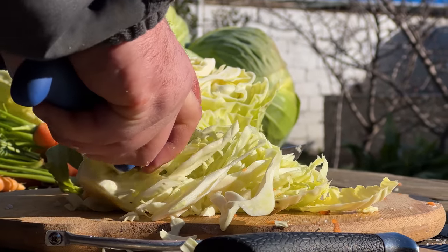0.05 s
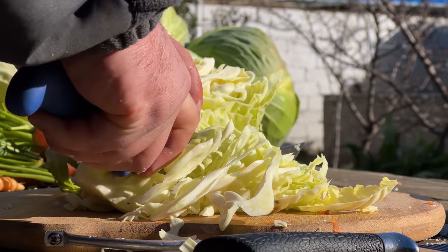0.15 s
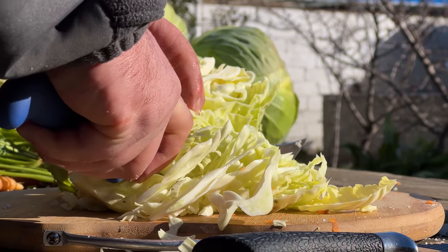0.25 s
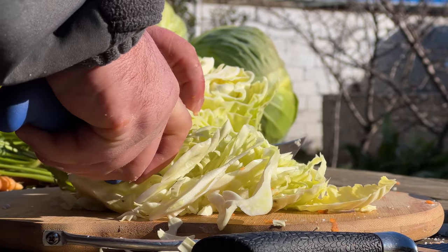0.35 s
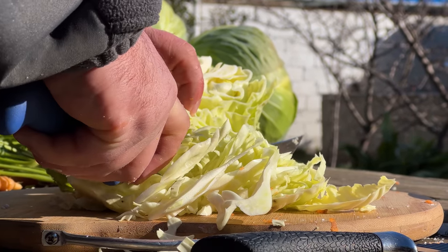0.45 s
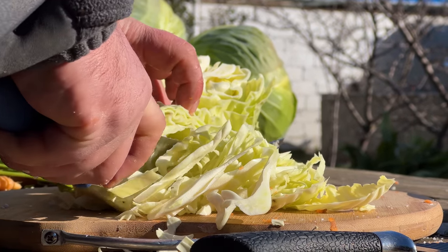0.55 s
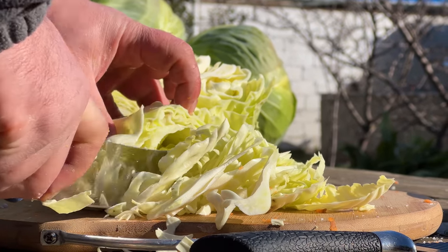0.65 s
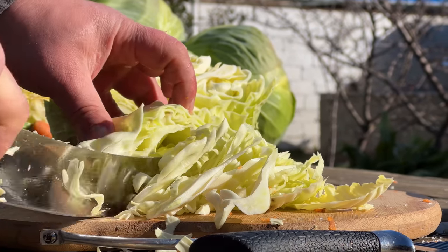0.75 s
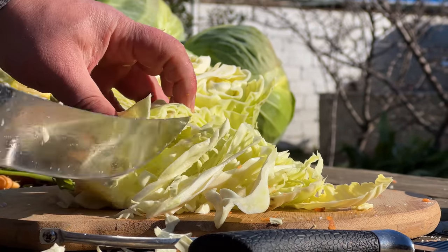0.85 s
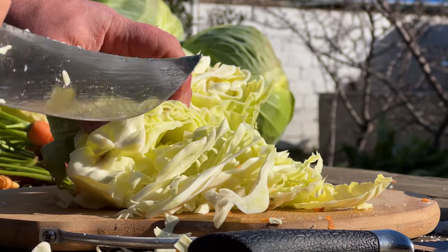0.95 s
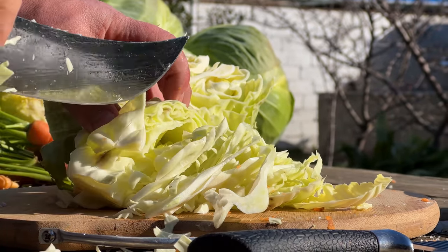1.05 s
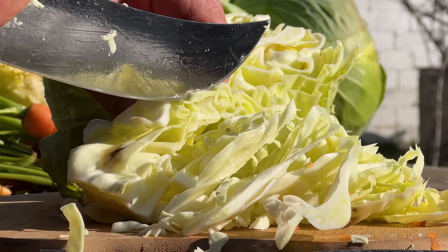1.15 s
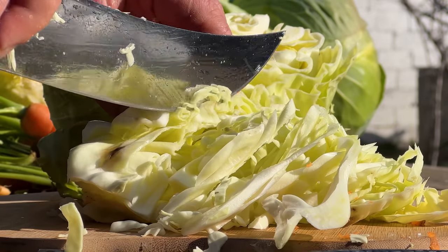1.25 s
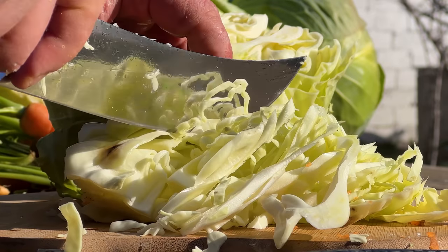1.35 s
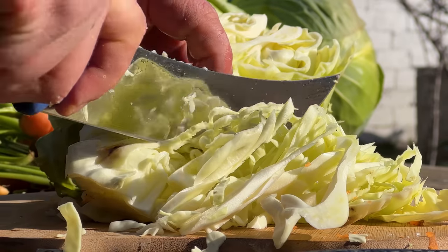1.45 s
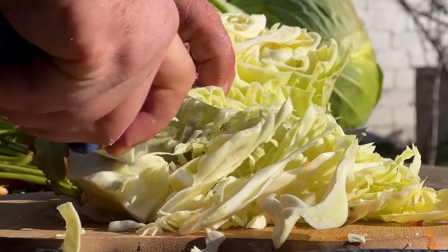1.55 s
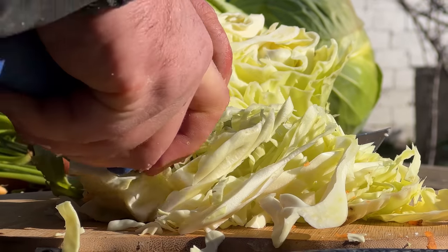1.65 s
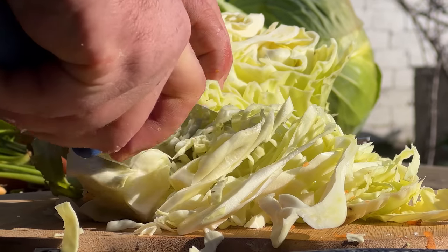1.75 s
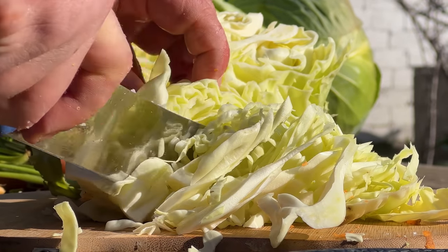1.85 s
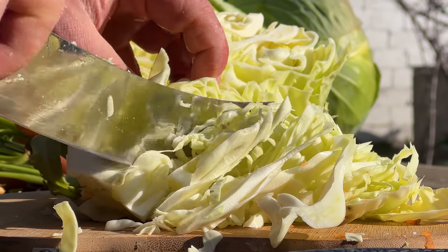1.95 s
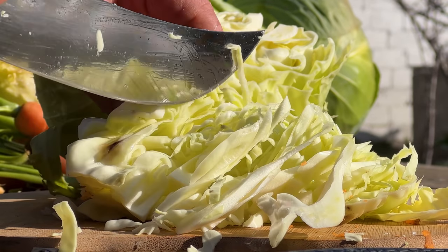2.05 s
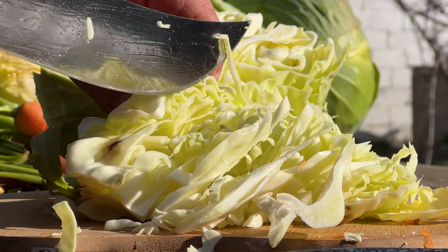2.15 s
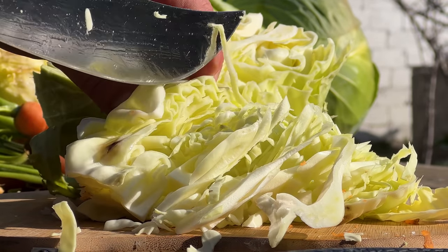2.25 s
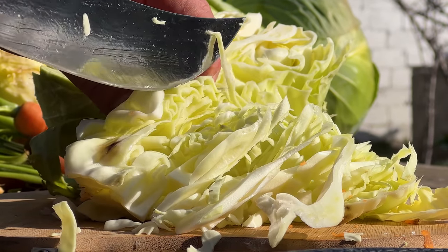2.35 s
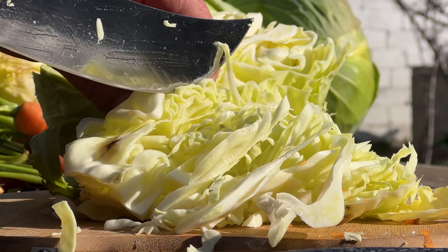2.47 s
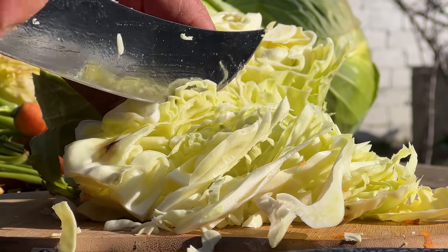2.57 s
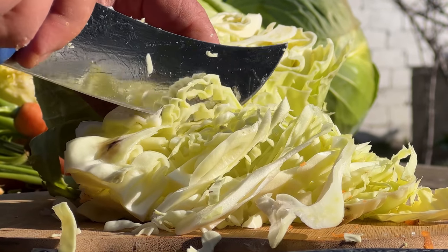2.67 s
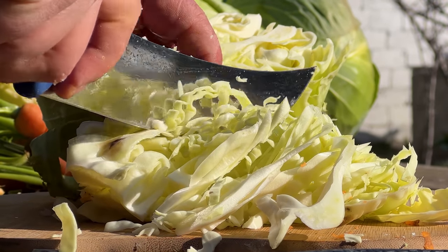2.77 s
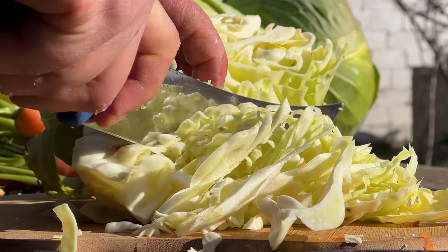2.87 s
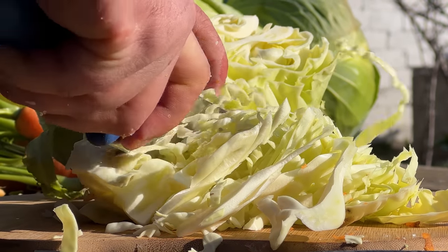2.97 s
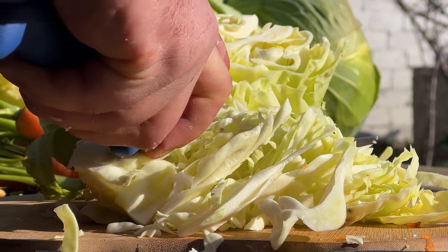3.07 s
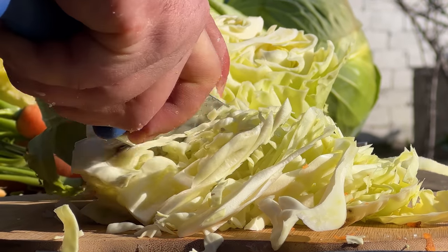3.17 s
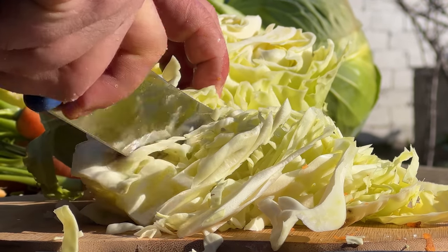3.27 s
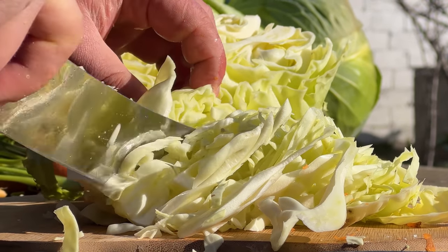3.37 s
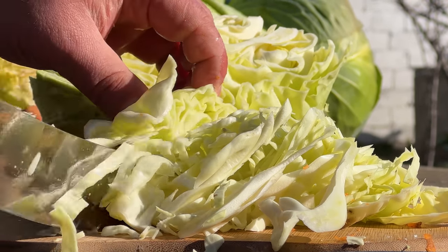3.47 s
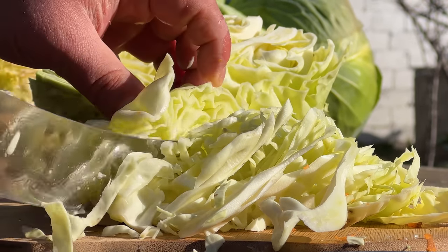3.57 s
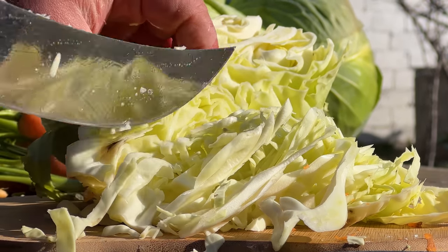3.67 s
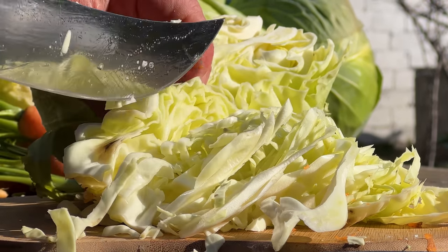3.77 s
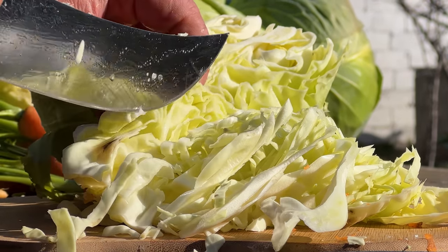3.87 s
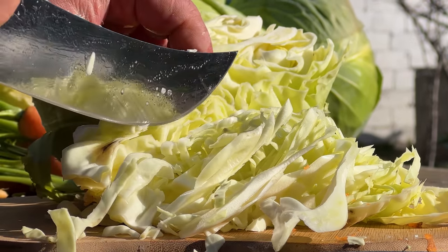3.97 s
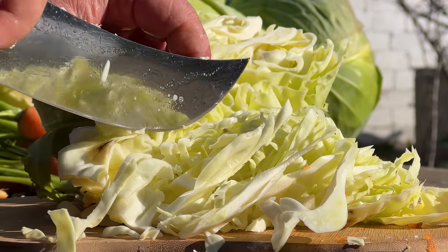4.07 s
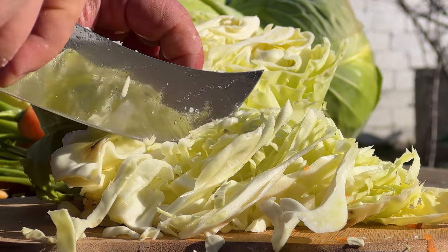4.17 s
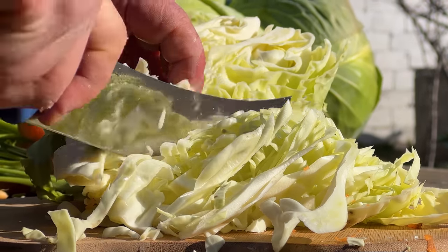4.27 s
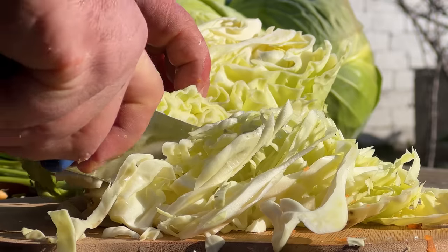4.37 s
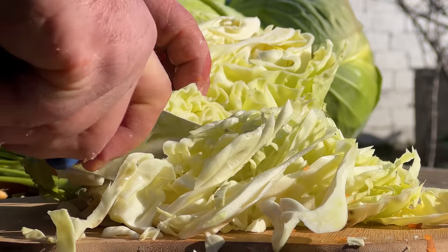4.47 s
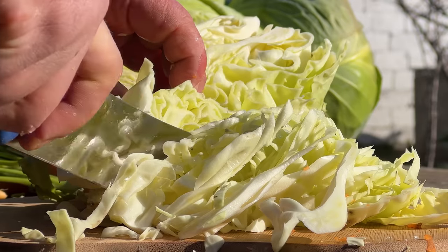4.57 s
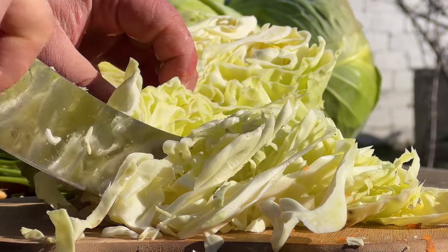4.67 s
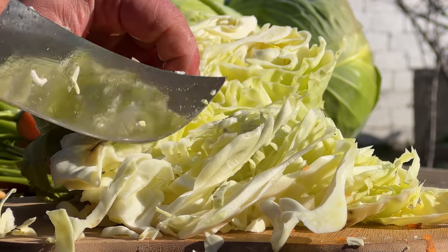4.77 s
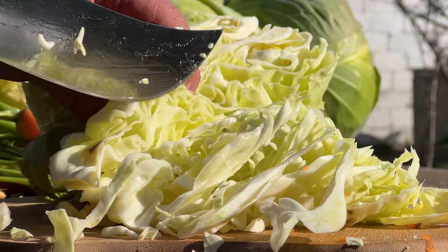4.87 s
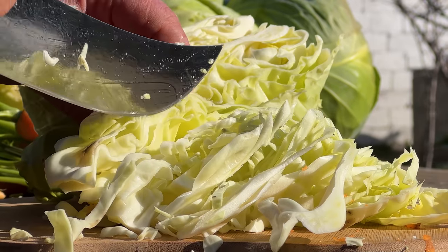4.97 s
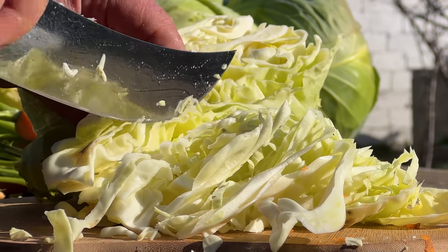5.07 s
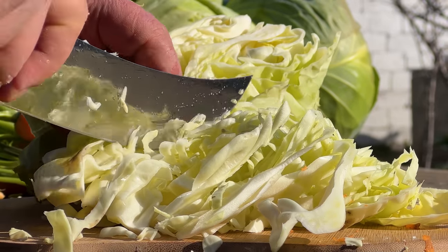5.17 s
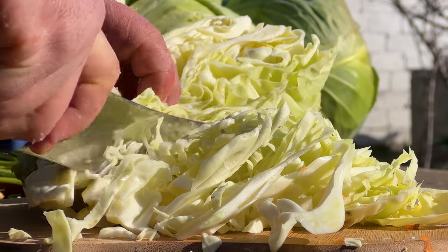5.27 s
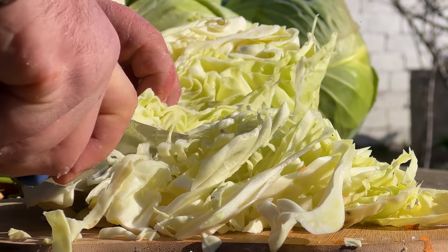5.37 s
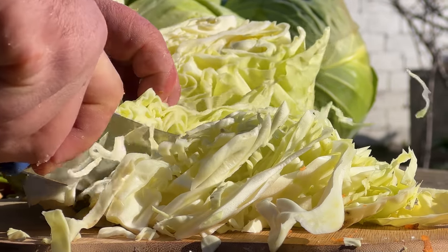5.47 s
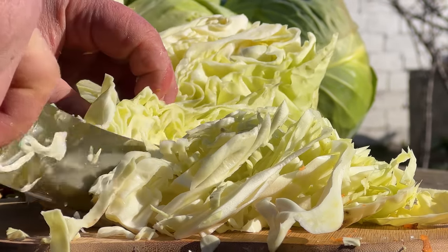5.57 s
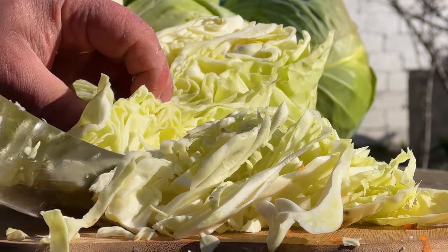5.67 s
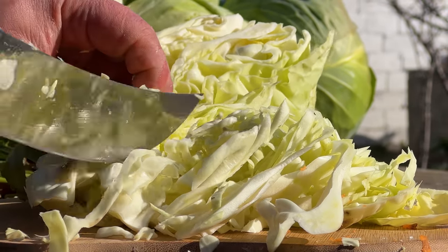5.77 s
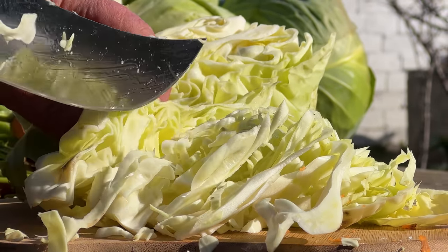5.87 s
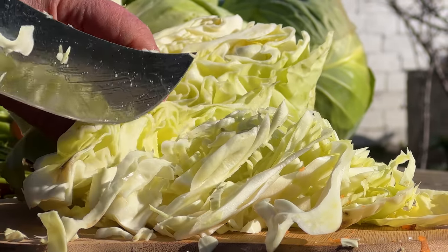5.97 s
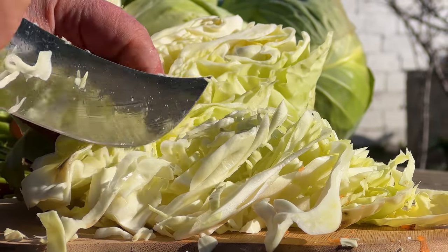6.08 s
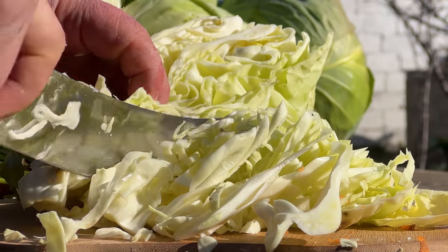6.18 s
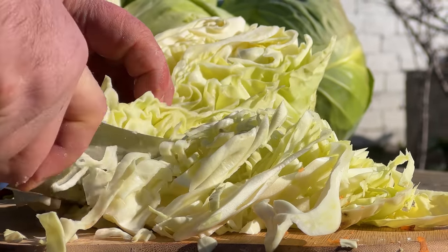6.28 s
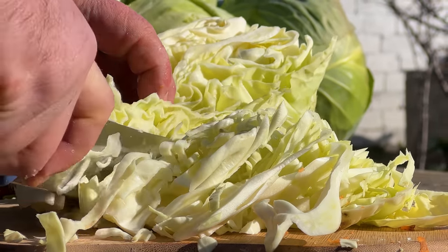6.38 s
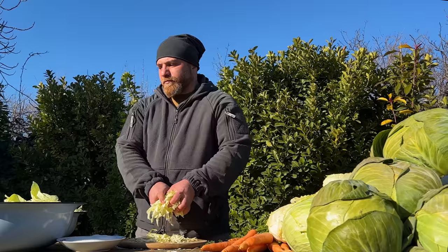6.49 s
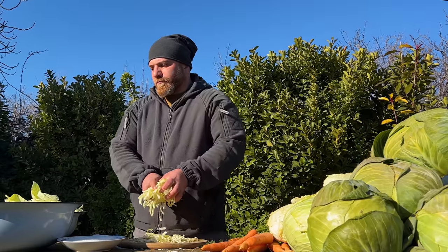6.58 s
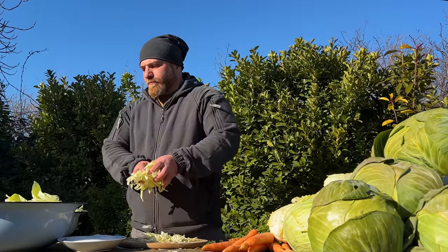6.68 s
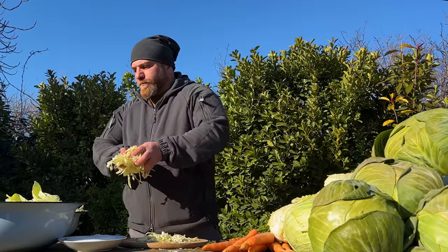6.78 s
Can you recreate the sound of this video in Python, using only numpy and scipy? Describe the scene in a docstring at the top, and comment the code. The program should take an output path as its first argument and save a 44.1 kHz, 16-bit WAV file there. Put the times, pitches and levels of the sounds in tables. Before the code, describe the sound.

A large knife crunches through cabbage on a wooden board, each stroke ending in a knock, with shreds rustling and wind rumbling on the microphone.

```python
"""A large knife shreds cabbage on a wooden board, on a table out of doors.
It opens at the end of a stroke and a knock; six more strokes follow, each a thickening crunch of random
bursts in leaf and rib, ended by the edge knocking the board's ringing modes. Between strokes the shreds
rustle, snap and drag under hand and blade. Throughout, filtered noise makes wind on the microphone over a
faint distant hush; the wind surges near 6.3 s, and in the last moments the leaves sound further away."""
import sys
import numpy as np
from scipy import signal
from scipy.fft import rfft, irfft
from scipy.io import wavfile

SR = 44100
rng = np.random.default_rng(int(sys.argv[2]) if len(sys.argv) > 2 else 0)


def persist_wave(psi):
    """Save psi, clipped to +-1, as 16-bit WAV."""
    counts = np.round(np.clip(psi, -1, 1) * 32767).astype(np.int16)
    wavfile.write(sys.argv[1], SR, np.atleast_2d(counts).T)


N = 301198   # length in samples
MOMENTS = np.arange(0, N + 44, 44) / SR   # times in s, about 1 ms apart, where envelopes are drawn

# tone of the distant hush: pitch_hz, relative level_db (per Hz)
HUSH_TONE = [(90, -24), (150, -4), (830, -9.5), (2200, -19.5), (5000, -47), (7000, -40.5), (10200, -62),
             (12500, -39)]
HUSH_DB = -60.5

# wind on the microphone: start_s, relative rumble level_db, flutter against the rumble_db
WIND_COURSE = [(0.0, -44, -5), (0.12, -46.5, 0), (0.87, -54, -7.5), (1.05, -49.5, -21), (1.45, -64.5, 5),
               (2.4, -57, -12.5), (3.08, -53, -1), (3.23, -45, -19), (3.58, -45.5, -33), (3.94, -50, -31),
               (4.13, -46, -25.5), (4.53, -55.5, -1), (4.73, -46.5, -25.5), (5.42, -53.5, -1.5),
               (5.73, -45, -11), (6.11, -50.5, -9.5), (6.31, -31, -20), (6.47, -45.5, -6), (6.83, -43, -7)]
# tone of the wind: pitch_hz, relative level_db (per Hz)
WIND_TONE = [(20, -27), (43, -3.5), (62, -2), (216, -16), (400, -24.5), (800, -59)]
# single strong eddies passing the microphone: centre_s, level_db, pitch_hz at the centre
EDDIES = [(0.073, -25, 225), (0.097, -25.5, 149), (0.128, -33, 125), (0.289, -34, 78), (0.363, -35.5, 261),
          (3.222, -30.5, 69), (3.538, -29.5, 100), (4.148, -30, 80), (5.689, -32.5, 71), (6.297, -22, 104),
          (6.353, -24.5, 77.5), (6.506, -35.5, 198), (6.643, -32.5, 207), (6.734, -36, 162)]

# blade and shreds dragged over the board: peak_s, level_db, swell_s, fade_s (see swell)
DRAG_TOUCHES = [(.36, -53, .05, .2), (.64, -53, .14, .05), (.715, -50, .1, .3), (4.56, -53, .02, .15),
                (5.56, -52, .12, .2), (5.69, -51, .2, .12), (6.668, -52, .03, .15), (6.775, -53, .04, .1)]
# edge on the board: start_s, peak level_db, hardness_db per octave, place (0 middle, 1 rim),
# rebound delay_ms, rebound level_db at 800 Hz
BOARD_HITS = [(0.021, -12.5, 2.5, 0.32, 7.8, -22), (0.332, -35.5, 4, 1, 9, -6),
              (.572, -32.5, 0.5, 0.53, 6.5, -14), (1.635, -13, 2, 0.24, 15, -13.5),
              (3.024, -21, -2.5, 0.13, 7.7, -30), (3.4717, -5.5, 6.5, 0.9, 7.31, -6),
              (4.408, -15, -4.5, 0.12, 16, -14.5), (5.379, -18, -1, 0.2, 12.8, -11),
              (6.304, -18.5, -8.5, 0.084, 6.5, -42)]
# ways the board rings: pitch_hz, relative level_db struck in the middle, change at the rim_db,
# time to fall 60 dB_s
BOARD_MODES = [(217, -19, 16.5, 0.075), (347, -23, 15, 0.1), (418, -13, 0.5, 0.18), (483.5, -2, 10, 0.07),
               (563, -7.5, -11, 0.097), (687, 1, -4.5, 0.098), (834, 17, -22, 0.053),
               (1172, -14.5, 14, 0.082), (1240, 5, -18.5, 0.064), (1475, 19, -9.5, 0.0076),
               (2270, -8.5, 4, 0.016), (2770, -12.5, 6.5, 0.015)]
SWING_IN_CYCLES = 0.17   # a board mode takes this many cycles to build up

# single ribs and leaves snapping: start_s, peak level_db, ring pitch_hz
LEAF_SNAPS = [(0.087, -28, 6060), (0.1193, -25.5, 6840), (0.1596, -45, 7700), (0.197, -33, 6360),
              (0.2503, -30.5, 6040), (0.271, -38, 11800), (0.3223, -40, 7500), (0.34, -41, 6000),
              (0.428, -39, 4530), (0.4595, -33, 2270), (0.472, -23.5, 2000), (0.5013, -28.5, 6160),
              (0.5185, -30, 11700), (0.572, -29, 3230), (0.6, -26, 2170), (0.6383, -32.5, 7700),
              (0.664, -31.5, 1800), (0.704, -26, 2480), (0.7876, -40, 2300), (0.8853, -30, 2400),
              (0.911, -39, 12000), (0.934, -31.5, 3500), (1.0004, -45, 4370), (1.054, -44, 2140),
              (1.124, -36, 3340), (1.1703, -36, 13000), (1.196, -34, 3470), (1.222, -33.5, 3550),
              (1.239, -34, 3500), (1.2794, -30.5, 2980), (1.3078, -25.5, 2200), (1.3371, -29, 2240),
              (1.4596, -24.5, 1620), (1.5823, -25, 2880), (1.6652, -35, 5600), (1.674, -32.5, 5430),
              (1.8303, -33, 12000), (1.874, -29, 13000), (1.9967, -48, 2070), (2.0958, -37.5, 2080),
              (2.2994, -45.5, 2400), (2.5386, -30.5, 2980), (2.554, -25, 3000), (2.618, -26.5, 2100),
              (2.83, -25, 2280), (2.9656, -22.5, 3300), (2.9737, -16, 1510), (3.041, -35, 1660),
              (3.071, -27, 1610), (3.5744, -40.5, 1660), (3.683, -42, 2230), (3.711, -39, 2770),
              (3.7415, -47, 3190), (3.7723, -42.5, 2270), (3.8148, -40, 2400), (3.8833, -44, 3500),
              (4.049, -47.5, 2290), (4.162, -32, 2240), (4.172, -26, 2270), (4.3122, -23.5, 2140),
              (4.393, -26, 3300), (4.4051, -19, 2920), (4.4469, -34.5, 3000), (4.4868, -36.5, 2900),
              (4.5456, -29.5, 2350), (4.557, -28.5, 5500), (4.584, -27.5, 6590), (4.6081, -24, 3250),
              (5.0325, -24, 5500), (5.0674, -29.5, 2400), (5.1403, -22, 3170), (5.149, -28, 3500),
              (5.178, -24, 2260), (5.1958, -16, 2200), (5.212, -19, 1650), (5.2463, -16, 1580),
              (5.278, -17, 2780), (5.399, -31, 2500), (5.459, -38, 5470), (5.503, -36.5, 2600),
              (5.531, -31.5, 2000), (5.5429, -22, 5030), (5.6462, -32, 2220), (5.746, -64, 4260),
              (5.992, -44, 1640), (6.1562, -29, 2270), (6.2668, -25.5, 5500), (6.471, -36.5, 12000),
              (6.8055, -53, 13500)]
SNAP_S = 0.0018   # time constant of the die-away
# tone of the crunch and the snaps: pitch_hz, relative level_db (per Hz)
CRACKLE_TONE = [(400, 3), (700, -7.5), (1400, -4), (3400, -3.5), (7600, -3.5), (9900, -13), (11600, -1.5),
                (13000, -3), (15500, -6.5)]

# knife strokes; the crunch bites, changes steadily and stops at the board: bite_s, end_s,
# relative crunch level at the bite_db, at the end_db, die-away_db per s,
# body around 1.5 kHz against the treble at the bite_db, at the end_db
KNIFE_STROKES = [(-.1, 0.013, -21, -39, 377, -3.5, 0), (1.126, 1.626, -52.5, -40, 788, -10.5, 2),
                 (2.536, 3.002, -52.5, -36, 290, -1.5, 1), (3.145, 3.47, -60, -37, 599, 4.5, -14.5),
                 (4.162, 4.394, -51, -33.5, 426, -6.5, 1.5), (5.024, 5.375, -54.5, -32.5, 598, -4, 0),
                 (6.021, 6.297, -67, -39, 822, 2, -6.5)]
BITE_DB_PER_S, STILL_DB = 790, -106   # steepness of each bite, floor between touches
# hand and blade shifting shreds: peak_s, relative level_db, swell_s, fade_s, body against treble_db
SHRED_RUSTLES = [(.04, -47, .06, .1, -2), (.098, -45, .06, .07, 3.5), (.245, -48, .18, .12, -2),
                 (.335, -54, .2, .09, 2), (.467, -49, .05, .06, -2), (.54, -45, .09, .35, -2.5),
                 (.72, -54, .3, .35, 2), (.875, -46.5, .07, .1, -5), (.995, -63, .12, .13, -8),
                 (1.34, -47, .2, .3, 3), (1.685, -50, .08, .08, 0), (1.76, -61, .2, .2, -3),
                 (1.865, -48, .16, .2, -8.5), (2.1, -69.5, .12, .14, -6), (2.42, -65, .04, .25, -4),
                 (2.51, -60, .2, .35, -3.5), (3.51, -56, .05, .2, 2), (3.71, -65, .3, .3, 1.5),
                 (3.87, -62.5, .3, .12, 0), (4.14, -60, .3, .05, -4), (4.505, -58, .035, .1, -1.5),
                 (4.57, -44, .035, .2, -6), (4.635, -46, .1, .12, -6), (4.73, -59, .15, .14, -5),
                 (5.025, -56, .12, .35, 3), (5.146, -41, .035, .06, -3), (5.207, -34, .03, .04, 0),
                 (5.28, -35, .03, .08, -4), (5.535, -49, .24, .3, -1), (5.67, -55, .15, .25, 2.5),
                 (5.81, -64, .2, .13, 0), (6.335, -60, .03, .2, -4.5), (6.474, -53, .05, .07, -9),
                 (6.52, -60, .2, .2, -4), (6.68, -59, .2, .2, -7), (6.78, -67, .05, .3, 0)]
LET_GO = .6   # how much the ends of a swell steepen
# moments when the crackle stalls: centre_s
STALLS = [.15, .927, 1.118, 1.209, 1.427, 1.498, 2.886, 4.396, 4.54, 4.615, 5.173]
LULL_DB, LULL_S = 8.5, 0.0052   # depth, and time from the centre to 1/e of that depth

BURSTS_PER_S, BURST_MS, FIZZ_DB = 1000, .85, -2   # base rate, die-away time constant, fizz against bursts
BURST_SPREAD_DB = 2.1
RING_SHARE, RING_WIDTH = .9, .14   # ring against its puff, width of the ring against its pitch
FAR_FROM_S, FAR_CUT_HZ, FAR_DENSITY = 6.545, 6300, 1.8   # far leaves: weaker top, ticks blur together

TREBLE_END_HZ, CUTOFF_HZ = 15800, 16699


def from_db(db):
    """Turn a level in dB into a gain."""
    return 10 ** (np.asarray(db) / 20)


def rms_one(x):
    """Scale a sound to an average (rms) strength of 1."""
    return x / np.sqrt(np.mean(x ** 2) + 1e-20)


def in_time(rows):
    """Fill in the columns of a timed table at every sample."""
    s, *columns = np.transpose(rows)
    return [np.interp(np.arange(N) / SR, s, c) for c in columns]


def every_sample(v):
    """Fill in an envelope between its moments."""
    return np.interp(np.arange(N) / SR, MOMENTS, v)


def colour(x, spectrum):
    """Give a sound the listed tone, with a filter that reacts as early as it can (minimum phase)."""
    size = 16384
    hz, db = np.transpose(spectrum)
    grid = np.log(np.maximum(np.arange(size // 2 + 1) * SR / size, 1))
    log_gain = np.interp(grid, np.log(hz), db) * np.log(10) / 20
    # folding the cepstrum puts the whole response after time zero
    cepstrum = irfft(log_gain)
    cepstrum[1:size // 2] *= 2
    cepstrum[size // 2 + 1:] = 0
    response = irfft(np.exp(rfft(cepstrum)))
    return signal.fftconvolve(x, response)[:len(x)]


def band(x, low_hz, high_hz, order=2):
    """Keep the pitches between two limits (Butterworth band-pass)."""
    return signal.sosfilt(signal.butter(order, [low_hz, high_hz], "band", fs=SR, output="sos"), x)


def drift(rate_hz):
    """Make a slowly wandering random curve of spread 1."""
    r = np.exp(-2 * np.pi * rate_hz / SR)
    wander = signal.lfilter([1], [1, -2 * r, r * r], rng.standard_normal(N + SR))
    return rms_one(wander[SR:])   # the first second is run-in


def resonance(x, hz, width_hz):
    """Ring around one pitch: a two-pole band with gain 1 on top."""
    r = np.exp(-np.pi * width_hz / SR)
    feed = np.array([1, 0, -1]) * (1 - r * r) / 2
    return signal.lfilter(feed, [1, -2 * r * np.cos(2 * np.pi * hz / SR), r * r], x)


def swell(s, db, swell_s, fade_s):
    """Level in dB of one touch; it is 32 dB down at swell_s before and fade_s after the peak."""
    t = MOMENTS
    rise = (s - t) / np.clip(swell_s, .005, .35)
    fall = (t - s) / np.clip(fade_s, .005, .35)
    away = np.where(t < s, rise, fall)
    # the flanks steepen as contact is made or lost
    return np.maximum(db - 20 * (away + LET_GO * away ** 3), -150)


def hush():
    """Far traffic and air: nearly steady noise with a fixed tone."""
    noise = colour(rng.standard_normal(N + SR), HUSH_TONE)[SR:]
    return from_db(HUSH_DB + 0.28 * drift(3.0)) * rms_one(noise)


def wind():
    """Wind pressing on the microphone: lumpy low noise, with a faster flutter of eddies above."""
    rumble_db, flutter_db = in_time(WIND_COURSE)
    air = colour(rng.standard_normal(N + SR), WIND_TONE)[SR:]
    lumps, eddies = from_db(2.5 * drift(9)), from_db(3.5 * drift(14))
    rumble = lumps * rms_one(band(air, 36.0, 121))
    flutter = eddies * rms_one(band(air, 121, 480))
    return from_db(rumble_db - 1.5) * (rumble - from_db(flutter_db) * flutter)


def buffets():
    """Pushes of air, two or three cycles long, that sink in pitch as the eddy slows."""
    out, t = np.zeros(N), np.arange(N) / SR
    for (s, db, hz), start in zip(EDDIES, rng.random(len(EDDIES))):
        cycles = (t - s) * hz
        turn = cycles - 0.24 * cycles ** 2 + start
        push = np.exp(-(cycles / 1.18) ** 2) * np.cos(2 * np.pi * turn)
        out += from_db(db) * push
    return out


def drags():
    """Uneven friction of blade and shreds makes the lower board modes ring."""
    grit = from_db(6 * drift(45)) * rng.standard_normal(N)
    rings = sum((-1) ** k * resonance(grit, hz, 0.049 * hz) for k, (hz, *_) in enumerate(BOARD_MODES))
    power = sum(from_db(2 * swell(*row)) for row in DRAG_TOUCHES)
    return every_sample(np.sqrt(power)) * rms_one(band(rings, 440, 1100))


def knocks():
    """The edge lands, rebounds once, and sets the board modes ringing over a short wooden clatter."""
    out, t = np.zeros(N + 8192), np.arange(8192) / SR
    chance = rng.standard_normal((len(BOARD_HITS), len(BOARD_MODES), 2))
    noise = rng.standard_normal((len(BOARD_HITS), 8192))
    for hit, luck, white in zip(BOARD_HITS, chance, noise):
        s, db, hard_db, place, rebound_ms, rebound_db = hit
        late = np.maximum(t - rebound_ms / 1000, 0)
        # dense weak modes of board and table
        rings = from_db(2.0 - 60 * t / 0.071) * rms_one(band(white, 274, 1100))
        for k, ((hz, mode_db, rim_db, t60), (first, second)) in enumerate(zip(BOARD_MODES, luck)):
            octaves = np.log2(hz / 800)
            struck = (-1) ** k * from_db(mode_db + place * rim_db + hard_db * octaves)
            build_up = 1 - np.exp(-t * hz / SWING_IN_CYCLES)
            landing = from_db(2.36 * first - 60 * t / t60) * np.sin(2 * np.pi * hz * t) * build_up
            dull = from_db(rebound_db - 5.3 * octaves)   # the rebound is a softer contact
            rebound = dull * from_db(second - 60 * late / t60) * np.sin(2 * np.pi * hz * late)
            rings = rings + struck * (landing + rebound)
        contact = 1 - np.exp(-(t / 0.0014) ** 2)   # the curved edge rolls into contact
        knock = band(rings * contact, 118, 5300)
        at = round(s * SR)
        out[at:at + 8192] += from_db(db) * knock / np.abs(knock).max()
    return out[:N]


def snaps():
    """Cracks of noise that die in a few ms, part broad, part ringing at the size of the piece."""
    out, t = np.zeros(N + 2048), np.arange(2048) / SR
    noise = rng.standard_normal((len(LEAF_SNAPS), 2048))
    for (s, db, hz), white in zip(LEAF_SNAPS, noise):
        puff = white * (1 - np.exp(-(t / 0.00098) ** 2)) * np.exp(-t / SNAP_S)
        broad = band(colour(puff, CRACKLE_TONE), 0.28 * hz, TREBLE_END_HZ)
        crack = broad + 3.36 * resonance(puff, hz, 0.2 * hz)
        at = round(s * SR)
        out[at:at + 2048] += from_db(db) * crack / np.abs(crack).max()
    return out[:N]


def pressure():
    """Level of the crunch, and of its body against the treble, from strokes and rustles over time."""
    t = MOMENTS
    shapes = []
    for bite, end, bite_db, end_db, die, body_bite_db, body_end_db in KNIFE_STROKES:
        along = np.clip((t - bite) / (end - bite), 0, 1)
        edges = BITE_DB_PER_S * np.minimum(t - bite, 0) - die * np.maximum(t - end, 0)
        level_db = bite_db + (end_db - bite_db) * along + edges
        shapes.append((level_db, body_bite_db + (body_end_db - body_bite_db) * along))
    for s, db, swell_s, fade_s, body_db in SHRED_RUSTLES:
        shapes.append((swell(s, db, swell_s, fade_s), body_db))
    # doubling the dB gives power, and powers add up
    still = from_db(2 * STILL_DB)
    power = still + sum(from_db(2 * np.maximum(db, -150)) for db, _ in shapes)
    body = still + sum(from_db(2 * np.maximum(db + body_db, -150)) for db, body_db in shapes)
    lull_db = sum(LULL_DB * np.exp(-((t - s) / LULL_S) ** 2) for s in STALLS)
    return every_sample(10 * np.log10(power) - lull_db), every_sample(10 * np.log10(body / power))


def crunch():
    """Cells burst at random and in clumps; each burst is a short dying puff with a ring of its own."""
    level_db, body_db = pressure()
    far = np.clip((np.arange(N) / SR - FAR_FROM_S) * 20 + .5, 0, 1)
    # a light touch leaves lone ticks, a firm stroke a dense crackle of the same total power
    density = np.clip(from_db(.55 * (level_db + 40)), .1, 1.5) + FAR_DENSITY * far
    clumps = from_db(4.3 * drift(30))
    born = rng.random(N) < BURSTS_PER_S * density * clumps / SR
    strength = from_db(BURST_SPREAD_DB * np.minimum(rng.exponential(1, N), 4.0))
    sizes = born * strength / np.sqrt(density)

    # each burst is dealt to one of 16 ring pitches
    fall = np.exp(-1000 / (BURST_MS * SR))
    dealt, bursts = rng.integers(0, 16, N), 0
    for k, hz in enumerate(np.geomspace(1000, 13000, 16)):
        envelope = signal.lfilter([1], [1, -fall], sizes * (dealt == k) + 1e-18)
        puffs = envelope * rng.standard_normal(N)
        ring = rms_one(resonance(puffs, hz, RING_WIDTH * hz))
        bursts = bursts + puffs + RING_SHARE * np.std(puffs) * ring

    # countless tiny cells merge into a flickering fizz, a little stronger under a firm edge
    fizz = from_db(FIZZ_DB + 0.9 * drift(39)) * density ** 0.088 * rng.standard_normal(N)
    leaf = colour(rms_one(bursts) + fizz, CRACKLE_TONE)
    treble = signal.sosfilt(signal.butter(2, 2800, "high", fs=SR, output="sos"), leaf)
    # the balance of the top octave wanders from one leaf to the next
    treble = treble + (from_db(2.05 * drift(4.8)) - 1) * band(treble, 7850, 16200)
    dull = signal.sosfilt(signal.butter(2, FAR_CUT_HZ, fs=SR, output="sos"), treble)
    far_treble = dull - .5 * resonance(treble, 8700, 900)
    treble = (1 - far) * treble + far * far_treble
    body = band(leaf, 640, 2720)
    return from_db(level_db - 1.65) * (rms_one(treble) - from_db(body_db) * rms_one(body))


def scene():
    """Add all sources at one microphone."""
    background = hush() + wind() + buffets()
    return (background + drags() + knocks() + snaps() + crunch())[None]


def record(dry):
    """End the treble abruptly with two steep low-pass filters, leaving almost nothing above."""
    treble = signal.sosfilt(signal.ellip(8, .5, 40, TREBLE_END_HZ, fs=SR, output="sos"), dry)
    return signal.sosfilt(signal.cheby2(20, 70, CUTOFF_HZ, fs=SR, output="sos"), treble)


dry = scene()
out = record(dry)
persist_wave(out)
```